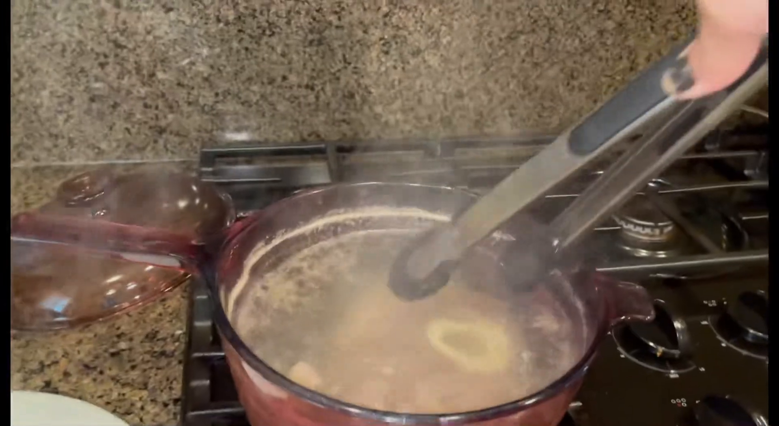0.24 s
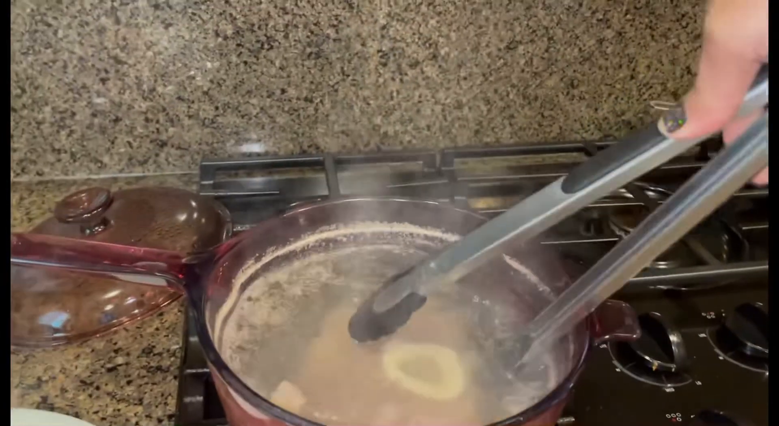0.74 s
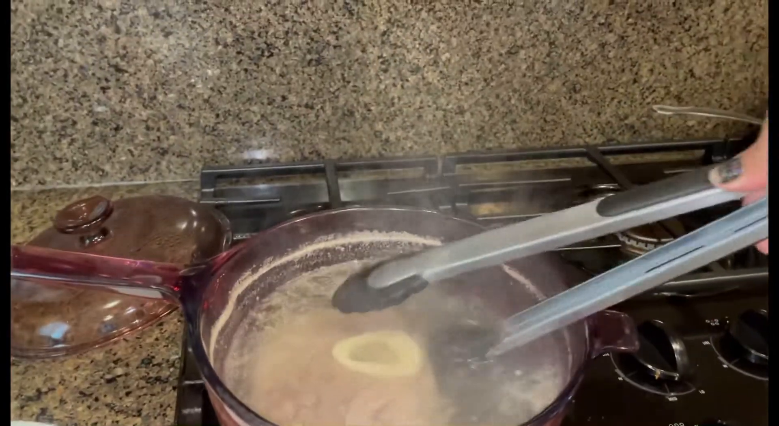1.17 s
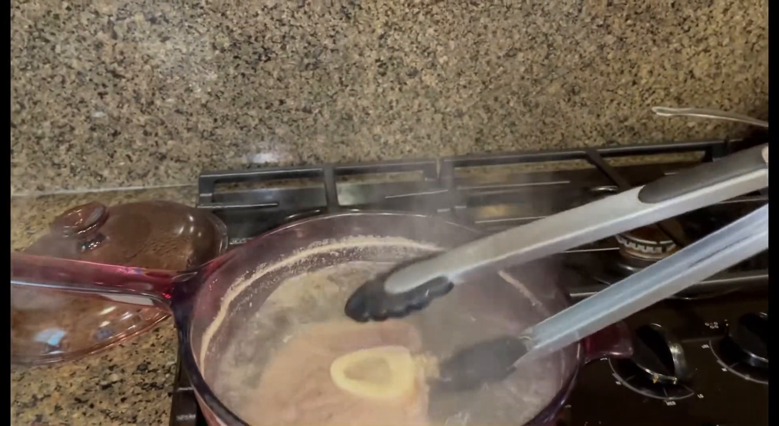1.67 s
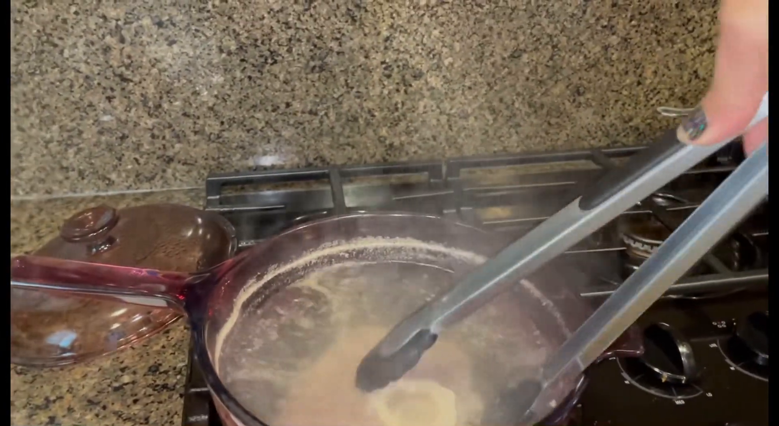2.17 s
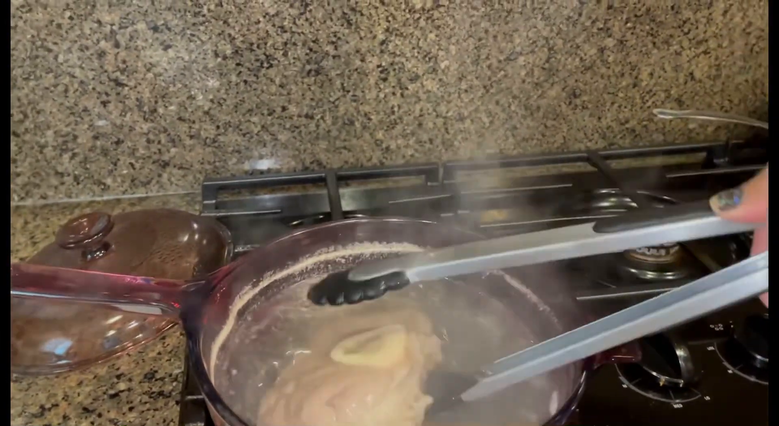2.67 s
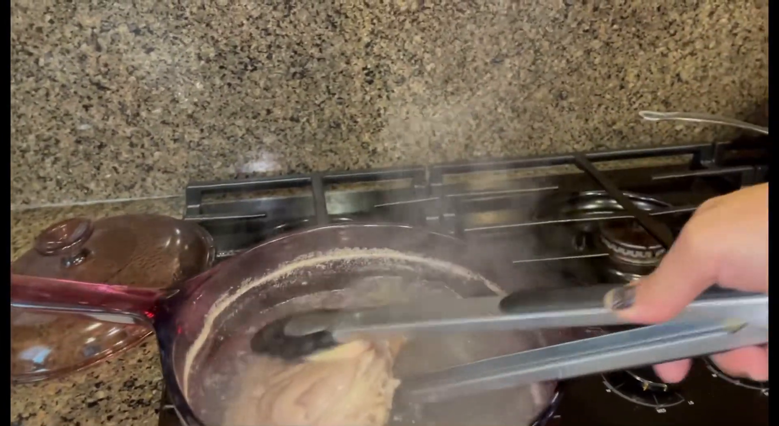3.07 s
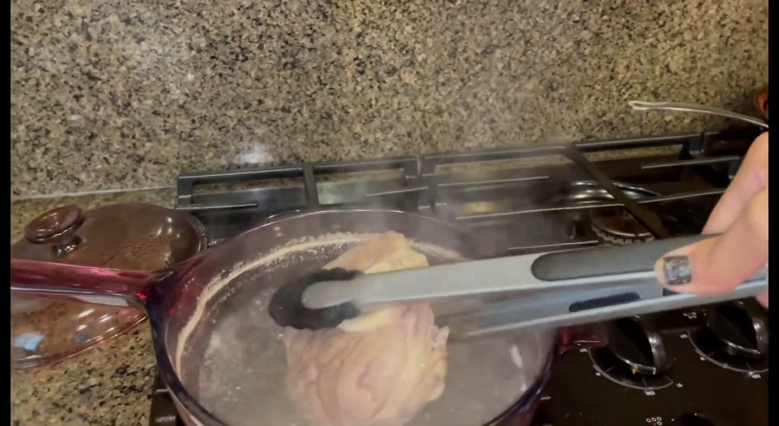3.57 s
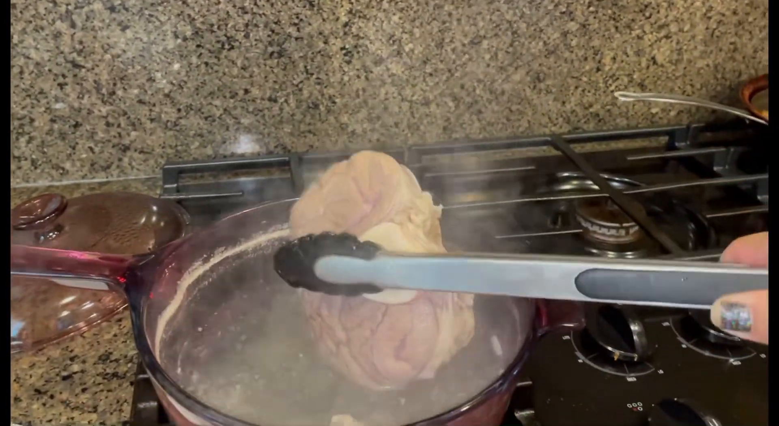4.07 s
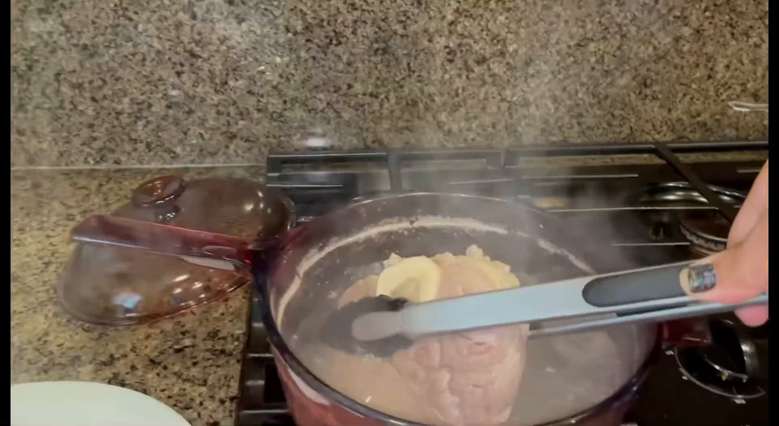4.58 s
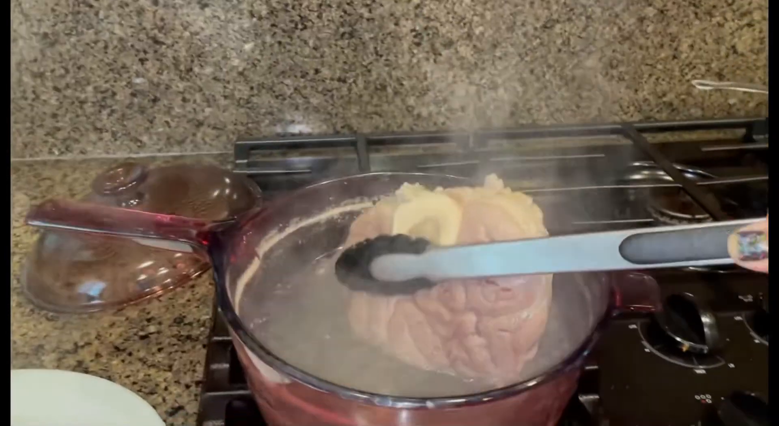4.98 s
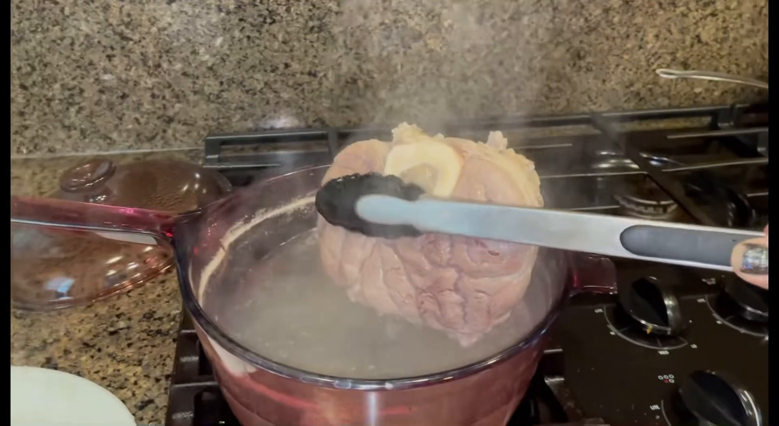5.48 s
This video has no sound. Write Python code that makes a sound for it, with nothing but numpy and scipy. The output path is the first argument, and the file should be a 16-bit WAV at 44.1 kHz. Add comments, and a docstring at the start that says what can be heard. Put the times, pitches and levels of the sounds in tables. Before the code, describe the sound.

A pot simmers close by with dark rumble, appliance hum and small liquid gulps. Metal tongs click on its glass rim, brightest near the beginning, with faint slides and dull underwater knocks. After a pause, the tong arms clatter together as meat drops back with a brief slosh. The kitchen ring cuts off suddenly, leaving hissing steam and crisp fizzing ticks.

```python
"""In a hard-walled kitchen, steel tongs tap and slide on the rim of a simmering glass pot.
The meat slips, the tong arms clash, and it splashes back; blows are ringing modes plus short noise cracks.
Ticks fizz, air pockets gulp, appliances hum, the burner rumbles and steam hisses: sines and filtered noise.
At 4.42 s most ringing stops short, and the rumble and hum dip briefly.
Two close microphone ports give a sum and a difference signal, each with its own colour."""
import sys
import numpy as np
from scipy import signal
from scipy.fft import rfft, irfft
from scipy.io import wavfile

SR = 44100
rng = np.random.default_rng(int(sys.argv[2]) if len(sys.argv) > 2 else 0)


def bounce(signal):
    """Save signal as a 16-bit WAV file at the path given by the first command-line argument."""
    frames = np.transpose(np.atleast_2d(signal))
    limited = np.clip(frames, -1, 1)
    pcm = np.round(limited * 32767).astype(np.int16)
    wavfile.write(sys.argv[1], SR, pcm)


N = 252693
TIME = np.arange(N) / SR   # s
BREAK_S = 4.42   # most ringing and the splash stop short here


def from_db(db):
    """Decibels to gain."""
    return 10 ** (np.asarray(db) / 20)


def rms_one(x):
    """Scale to unit rms."""
    return x / np.sqrt(np.mean(x ** 2) + 1e-20)


def in_time(rows):
    """Columns of a curve at every sample."""
    s, *columns = np.transpose(rows)
    return [np.interp(TIME, s, c) for c in columns]


def at_hz(points, hz):
    """Value of a (frequency, value) table, straight on a log axis."""
    table_hz, values = np.array(points).T
    return np.interp(np.log(hz + 1), np.log(table_hz), values)


def coloured(x, *spectra):
    """Filter by the sum of dB spectra."""
    hz = np.fft.rfftfreq(x.shape[-1], 1 / SR)
    gain = from_db(sum(at_hz(spectrum, hz) for spectrum in spectra))
    return irfft(rfft(x) * gain, x.shape[-1])


def band_pass(x, order, low_hz, high_hz):
    """Keep only the sound between two frequencies."""
    return signal.sosfilt(signal.butter(order, [low_hz, high_hz], "band", fs=SR, output="sos"), x)


def clicks_at(seconds, level_db):
    """Silence with one click of the given level at each time."""
    clicks = np.zeros(N)
    clicks[np.round(seconds * SR).astype(int)] = from_db(level_db)
    return clicks


def drift(rate):
    """Slow random wander of spread 1, made at every 40th sample and joined by straight lines."""
    r = np.exp(-80 * np.pi * rate / SR)
    slow = signal.lfilter([1], [1, -2 * r, r * r], rng.standard_normal(N // 40 + 2002))[2000:]
    return np.interp(np.arange(N) / 40, np.arange(len(slow)), rms_one(slow))


def ring(clicks, hz, t60):
    """A unit click sets off a dying sine of starting height 1; t60 is the time to fall 60 dB."""
    r, w = from_db(-60 / (t60 * SR)), 2 * np.pi * hz / SR
    return signal.lfilter([0, np.sin(w)], [1, -2 * r * np.cos(w), r * r], clicks + 1e-18)


def gliding_ring(clicks, hz, t60):
    """As ring, for a pitch given at every sample; the imaginary part is the sine."""
    turn = np.exp(2j * np.pi * np.cumsum(hz) / SR)
    return turn * signal.lfilter([1], [1, -from_db(-60 / (t60 * SR))], clicks / turn + 1e-18)


RISE_S = 0.00046   # time constant of a burst's rise


def bursts(seconds, level_db, t60):
    """Noise under a quick rise and exponential fall, two unrelated draws."""
    rise = np.exp(-1 / (RISE_S * SR))
    fall = from_db(-60 / (t60 * SR))
    poles = np.convolve([1, -fall], [1, -rise])
    shape = signal.lfilter([1 - rise], poles, clicks_at(seconds, level_db) + 1e-18)
    return shape * rng.standard_normal((2, N))


def strokes(table, edges):
    """Level in dB: a ramp in, a straight run from start to end level, a ramp out; the loudest stroke wins."""
    rise, fall = edges   # dB per s
    levels = []
    for s, length, start_db, end_db in table:
        run = np.interp(TIME, [s, s + length], [start_db, end_db])
        ramp_in = rise * np.maximum(s - TIME, 0)
        ramp_out = fall * np.maximum(TIME - s - length, 0)
        levels.append(run - ramp_in - ramp_out)
    return np.max(levels, axis=0)


def slips(level_db, per_s, uneven_db):
    """Rubbing as uneven small slips, clumped by a random wander of their rate."""
    born = rng.random(N) < per_s * from_db(3.5 * drift(15)) / SR
    return born * from_db(uneven_db * np.minimum(rng.exponential(1, N), 5) + level_db)


# edges of the mode groups: (frequency [Hz])
GROUP_EDGES_HZ = [300, 1500, 2700, 4500, 7500, 16000]
SNAP_DB = 10.5   # the first instant of a crack, over its noise level
SHIMMER_DB, SHIMMER_T60_S = -20.5, 0.22


def cracks_and_shimmer(s, peak_db, crack_db, group_db, shimmer):
    """A blow's short crack, and its countless faint modes heard as dying noise, band by band."""
    crack, faint = np.zeros((2, 2, N))
    for low, high, shade_db in zip(GROUP_EDGES_HZ, GROUP_EDGES_HZ[1:], group_db):
        level_db = peak_db + crack_db + shade_db + 14.5
        noise = bursts(s, level_db, 0.00081) + bursts(s, level_db - 17.0, 0.058)
        noise[0, np.round((s + RISE_S) * SR).astype(int)] += from_db(level_db + SNAP_DB)
        crack += band_pass(noise, 2, low, high)
        faint += band_pass(bursts(s, peak_db + shade_db + SHIMMER_DB, SHIMMER_T60_S), 2, low, high)
    return crack + coloured(faint, shimmer)


# how far brightness tilts each mode group: (distance from 2 kHz [octaves])
GROUP_OCTAVES = [0, 0.092, 0.62, 1, 2.36]
# how rubbing shares out over the modes: (frequency [Hz], level [dB])
RUB = [(400, -15), (1000, -9.5), (2250, -7), (2700, -3), (4400, -4), (5150, -8), (6000, -2.5), (9000, -9),
       (14000, -9.5)]
DETUNE = 0.0077   # grip and place shift each mode from blow to blow, at most this share of pitch
PORT_TURN = 2.1   # phase of a mode in the difference against the sum (radians)


def blows(table, modes, tuned, shimmer, share_db, pan_db, contact, rubbing, scatter_db):
    """Every blow rings every mode, retuned a little, and adds a crack; the grip-tuned ring is returned apart."""
    s, peak_db, brightness, crack_db, body_db, lean_db, ring_pitch, ring_db = np.transpose(table)
    group_db = np.outer(GROUP_OCTAVES, brightness) + np.reshape(share_db, (-1, 1))
    group_db += [body_db, 0 * s, lean_db, -lean_db, 0 * s]
    latest_blow = np.maximum(np.searchsorted(s, TIME) - 1, 0)

    def struck_mode(hz, level_db, t60, scatter_db):
        """One mode, pitch and level given for each blow, as sum and difference."""
        rub_gain = from_db(level_db.mean() + at_hz(RUB, hz.mean()))
        clicks = rubbing * rub_gain * rng.choice([-1, 1], N)
        chance = rng.random((len(s), 3))
        # each mode starts at its own random moment within the contact
        at = np.round((s + contact * chance[:, 0]) * SR).astype(int)
        group = np.searchsorted(GROUP_EDGES_HZ[1:], hz.mean())
        scatter = scatter_db * (2 * chance[:, 1] - 1.5)
        clicks[at] += from_db(peak_db + level_db + group_db[group] + scatter - 4.5)
        blow_hz = hz * (1 + DETUNE * (2 * chance[:, 2] - 1))
        wave = gliding_ring(clicks, blow_hz[latest_blow], t60)
        side_turn = rng.choice([-1, 1]) * np.exp(1j * PORT_TURN)
        return np.imag(wave * [[1], [side_turn]])

    out = sum(struck_mode(hz + 0 * s, level_db + 0 * s, t60, scatter_db) for hz, level_db, t60 in modes)
    beamed = sum(struck_mode(share * ring_pitch, level_db + ring_db, t60, 0) for share, level_db, t60 in tuned)
    out += cracks_and_shimmer(s, peak_db, crack_db, group_db, shimmer)
    out[1] += out[0] * np.tanh(pan_db / 17)   # sideways place leaks sum into difference
    return out, beamed


# tongs on the glass rim: (time [s], level at 2 kHz [dB], brightness [dB per octave], crack [dB],
# body under 1.5 kHz [dB], lean from 5 to 3.6 kHz [dB], pitch of the grip-tuned ring [Hz], its level [dB])
TAPS = [(0.0432, -48, -8.5, -10, -4.5, 3, 4760, 2), (.117, -67, 2.5, -6, -12, 2.5, 5060, -12),
        (0.3717, -33, 4.5, -4, 0, 2.5, 4890, 4), (0.394, -39, 2.5, -16, 2.5, 1, 4900, 2),
        (0.4103, -42, -7.5, -9, -1.5, -2, 4840, 4), (0.8909, -34.5, -0.1, -4.5, -4, 1.8, 5040, -0.5),
        (1.0195, -48.5, 0.5, -13, 0, 1, 5140, -6), (1.3701, -27, 2, 0, -2.5, 1, 5170, 1.5),
        (1.5014, -45, -4, 4, -2, 0.5, 5070, -3), (2.133, -47.5, -4, -12, 4.5, 1, 5100, -6),
        (2.1779, -40.5, 1, 2.5, 0.5, 4.5, 5170, 7.5), (2.3127, -50.5, -4.5, 1, 1.5, 1.5, 5050, 5),
        (2.397, -59, -10, -10, 7, -4, 5100, -4), (2.4251, -45.5, -1.5, -4, 2.5, 1, 4870, -3),
        (2.7671, -38.5, 1, -3.5, -2.5, 0.5, 4360, -3), (2.8409, -44, -2.5, -8, -1, 0.5, 5170, -1.5),
        (2.8939, -52.5, -21, -18, -1, .1, 5000, 0), (2.972, -51, -6, -10, -15, 2.5, 4860, -8),
        (3.0071, -58, -14, -17, -13, 2, 5100, -0.5)]
# an arm slides on the rim: (start [s], length [s], level at the start [dB], level at the end [dB])
SLIDE = [(1.6, 0.23, -85, -81), (2.04, 0.43, -77, -78.5), (2.78, 0.08, -82, -82), (2.893, 0.021, -85, -90),
         (2.93, .06, -90, -91)]
# ringing modes of the rim: (frequency [Hz], level [dB], time to fall 60 dB [s])
RIM = [(320.7, -7.5, 0.19), (376, -8.5, 0.12), (421, -3.5, 0.14), (565, -12, 0.17), (671, -13, 0.19),
       (743, -7.5, 0.044), (915, -11, 0.18), (1042, -6.5, 0.11), (1079, -11.5, 0.16), (1312, -7.5, 0.078),
       (1459, -9.5, 0.14), (1593, -7, 0.023), (2210, -5.5, 0.032), (2275, 7, 0.031), (2450, -8, 0.0322),
       (2507, -5.5, 0.083), (2650, -18, 0.16), (2890, -0.5, 0.015), (3220, 0, 0.0024), (3424, -1, 0.022),
       (3684, -5.5, 0.025), (3530, -20.5, 0.14), (3587, -14.5, 0.16), (3880, -8, .05), (4030, -3, 0.021),
       (4190, 2.5, 0.011), (4830, -14, 0.14), (5100, -9.5, 0.11), (5230, -15, .08), (5410, -12.5, 0.095),
       (5700, -8, 0.0099), (6400, -27, 0.056), (6170, -20, 0.021), (6540, 0, 0.0061), (7230, -1, 0.014),
       (8170, 4.5, 0.015), (9700, -3, 0.0061), (10860, 4.5, 0.019), (13000, 11, 0.01)]
# grip-tuned ring: (share of its pitch [ratio], level [dB], time to fall 60 dB [s])
RIM_RING = [(.965, 0, 0.025), (1.002, 9.5, .013), (1.04, -3, 0.02)]
# colour of the faint rim modes: (frequency [Hz], level [dB])
RIM_SHIMMER = [(1500, 8), (1900, -9), (2200, 21), (2520, 6), (2800, 5), (3550, 13), (3850, -14), (4300, 4),
               (4700, -1), (5150, 10), (5400, 8), (6000, -1.5), (8000, 1)]
# share of a tap in each mode group: (level [dB])
RIM_GROUP_DB = [0.67, 1, 0.37, -1, -3.1]


def rim_taps():
    """Steel taps and rubs the glass rim and sets its modes ringing."""
    rubbing = slips(strokes(SLIDE, edges=(210, 340)), per_s=1000.0, uneven_db=0.5)
    return blows(TAPS, RIM, RIM_RING, RIM_SHIMMER, RIM_GROUP_DB, pan_db=2.5,
                 contact=.0016, rubbing=rubbing, scatter_db=6.0)   # contact in s


# the arms clash and rattle, their ring sinks as they spring open: columns [units] as for the taps
CLASH = [(4.2222, -63.5, 2, -9, -8.5, -1, 2330, -6.5), (4.2445, -54, -4, -13, -3, -3, 2380, 4),
         (4.2615, -40.5, -3, -22.5, 4, 0, 2450, 15.5), (4.2635, -29, -7.5, -20.5, 6, -2.8, 2323, 17),
         (4.2692, -29, 3.5, -12, 8.5, 3.5, 2335, 7.5), (4.2812, -20, 0.5, 3.5, -8.5, -0.5, 2300, -5),
         (4.2838, -21, -6.5, -11, -1, 5, 2170, 6.5), (4.2948, -32.5, 3.5, 4, -4, -1.5, 2100, -11.5),
         (4.3058, -30, 3.5, -6, -5, 2.6, 2210, 9), (4.3115, -36, -5, -15.5, 1.5, -3.5, 2120, 7),
         (4.3155, -40.5, -5.5, -4, -4.5, -3, 2080, -4.5), (4.3275, -39, -4.5, -9.5, 10.5, 4, 2110, 0.5),
         (4.338, -47, -2, -1.5, 5, 3.5, 2100, -7)]
# the arms scrape off the meat, chatter, settle:
# (start [s], length [s], level at the start [dB], level at the end [dB])
CHATTER = [(4.236, 0.022, -71, -63), (4.262, 0.058, -46, -54), (4.32, 0.041, -58, -69)]
# ringing modes of the arms: (frequency [Hz], level [dB], time to fall 60 dB [s])
ARMS = [(615, -18.5, 0.015), (780, -12.5, 0.016), (903, -4.5, 0.058), (968, -4, 0.03), (1276, -6.5, 0.044),
        (1544, -5.5, 0.03), (2670, -5, 0.021), (3090, -1.5, 0.0059), (3590, -13.5, .012), (4010, -7, 0.038),
        (4000, -4, 0.015), (4400, -1.5, 0.017), (4840, -3, 0.011), (4900, -15, 0.011), (5200, -7.5, 0.023),
        (5990, -3.5, 0.01), (6720, -2, 0.028), (5740, -9, 0.0085), (6870, -8.5, 0.018), (7040, -9.5, 0.01),
        (8950, 5.5, 0.01), (11200, 7.5, 0.0072), (11620, -5, 0.011), (14000, -8.5, 0.0075),
        (12740, -7, 0.0097)]
# grip-tuned ring: (share of its pitch [ratio], level [dB], time to fall 60 dB [s])
ARM_RING = [(1.005, 3.5, 0.036), (1.04, -15, .013)]
# colour of the faint arm modes: (frequency [Hz], level [dB])
ARM_SHIMMER = [(1500, 0.5), (4000, 0.047), (6400, 1.5), (8000, -0.5)]
# share of a clash in each mode group: (level [dB])
ARM_GROUP_DB = [-3.5, -3, 4, 2, -1]


def arm_clash():
    """The tong arms hit and scrape, and their own steel modes ring."""
    rubbing = slips(strokes(CHATTER, edges=(2800, 2000)), per_s=1500., uneven_db=4.5)
    return blows(CLASH, ARMS, ARM_RING, ARM_SHIMMER, ARM_GROUP_DB, pan_db=3.5,
                 contact=0.00089, rubbing=rubbing, scatter_db=5)   # contact in s


# the meat shifts, later falls back in:
# (start [s], length [s], level at the start [dB], level at the end [dB])
SPLASH = [(2.865, 0.039, -55.5, -45.5), (4.326, 0.044, -40, -43)]


def splash():
    """A low lumpy slosh: noise between 50 and 300 Hz, silent after the break."""
    slosh = band_pass(rng.standard_normal((2, N)), 3, 50, 300)
    level = from_db(strokes(SPLASH, edges=(4900, 480)))
    return rms_one(slosh) * level * (TIME < BREAK_S) * [[1], [.2]]


# short ticks with a fizz: the scrape's onset at 4.24 s, then drops spitting on hot metal:
# (time [s], tick level [dB], dull part level [dB], fizz level [dB])
TICKS = [(4.24, -46, -38.5, -41.5), (4.6272, -27, -25.5, -44.5), (5.0794, -29.5, -38.5, -47.5)]


def fizzing_ticks():
    """A sharp tick with a fizz after it, plus a duller part."""
    s, peak_db, dull_db, fizz_db = np.transpose(TICKS)
    bright = bursts(s, peak_db + 1.0, 0.0071) + bursts(s, fizz_db, 0.15)
    dull = bursts(s, dull_db, 0.0028) + bursts(s, dull_db - 19.5, 0.11)
    # colours as (Hz, dB)
    bright_colour = [(5000, -33.0), (7500, -3.0), (14000, 5.5), (16000, -4.5)]
    dull_colour = [(250, -10.5), (1100, 3), (1850, 3.5), (2800, -1.5), (4100, 0.5), (4600, 0.0),
                   (5200, -3.0), (6200, -10.5), (9000, -18.5)]
    return coloured(bright, bright_colour) + coloured(dull, dull_colour)


# bone on glass under the broth: (time [s], click level [dB])
KNOCKS = [(2.135, -45.5), (2.971, -45.5)]
# modes of the knock: (frequency [Hz], level [dB], time to fall 60 dB [s])
SUNK_MODES = [(996, 2.5, 0.025), (1150, -7, 0.0088), (1366, -1, 0.026), (1610, -25, .02)]


def knocks():
    """Short and dull, damped by the liquid: a click into a few broad modes."""
    clicks = clicks_at(*np.transpose(KNOCKS))
    knock = sum(from_db(level_db) * ring(clicks, hz, t60) for hz, level_db, t60 in SUNK_MODES)
    return knock * np.array([[1], [.7]])


def bubbles(count):
    """Small bubbles of the simmer: rows like those of the gulps, drawn at random."""
    low_hz, high_hz = 201, 656
    rows = []
    for when, size, pitch in rng.random((count, 3)):
        level_db = -59 - 2.5 * np.log(0.17 + .8 * size)
        rows.append((when * TIME[-1], level_db, low_hz * (high_hz / low_hz) ** pitch))
    return rows


# broth gulps round the meat: (time [s], level [dB], starting pitch [Hz])
GULPS = [(.136, -54, 764), (.223, -49.5, 700), (2.737, -58, 900), (2.89, -47, 170), (2.903, -53, 276),
         (2.918, -57, 200), (2.873, -69, 460), (2.913, -47, 754), (2.926, -56, 375), (0.269, -68, 415),
         (1.009, -51, 1460), (1.258, -56, 672), (2.995, -68, 950), (0.324, -42.5, 307), (1.989, -39, 108.6),
         (2.13, -44, 261), (2.17, -44, 72), (2.289, -44, 75.3), (2.43, -47.5, 193), (2.86, -43, 74.5),
         (2.893, -47.5, 625), (2.905, -48, 583), (2.9, -44, 118), (3.582, -52, 152.7)]


def gulps():
    """Each air pocket rings a few cycles while its pitch rises."""
    out = np.zeros(N + SR)
    t = TIME[:SR // 8]
    for s, peak_db, hz in GULPS + bubbles(count=60):
        cycles = hz * t
        rising_tone = np.sin(2 * np.pi * cycles * (1 + 0.037 * cycles))
        envelope = np.exp(-cycles / 3.2) * (1 - np.exp(-cycles / 0.2))
        start = round(s * SR)
        out[start:start + len(t)] += from_db(peak_db) * rising_tone * envelope
    return out[:N] * [[1], [.25]]


# steam puffs: (time [s], width [s], rise [dB])
PUFFS = [(4.14, 0.017, 14.5), (4.83, 0.0071, 4.5), (5.40, 0.0065, 5), (5.499, 0.0061, 4.5)]
# colour of the hiss in the sum: (frequency [Hz], level [dB per Hz])
STEAM_SUM = [(4500, -10), (5800, -12.5), (7200, -3.5), (7700, -10.5), (8200, -29.5), (9400, -27),
             (9900, -8), (11000, -4.5), (13100, 0.5), (14200, -6), (14700, -14.5), (16000, -29)]
# colour of the hiss in the difference: (frequency [Hz], level [dB per Hz])
STEAM_DIFF = [(4500, -16.5), (6240, -13.5), (7170, -4.5), (8160, 1), (9850, -4), (12600, -7.5),
              (13000, -19), (13400, -52), (16000, -36.5)]
# colour of the ventilation: (frequency [Hz], level [dB per Hz])
AIR = [(1200, -34), (1600, -26.5), (2100, -6), (2800, -5.5), (3150, 2), (3400, -3.5), (4300, -8.5),
       (4800, -14), (5600, -20), (6500, -37.5)]


def steam(level_db):
    """Smooth faint hiss with a few puffs, over ventilation noise that swells a little less with them."""
    puff_db = sum(rise_db * np.exp(-.5 * ((TIME - s) / width) ** 2) for s, width, rise_db in PUFFS)
    noise = rng.standard_normal((4, N))
    hiss_sum = from_db(0.5) * rms_one(coloured(noise[0], STEAM_SUM))
    hiss_diff = from_db(1) * rms_one(coloured(noise[1], STEAM_DIFF))
    hiss_gain = from_db(level_db + puff_db + 1.1 * drift(12))
    air = rms_one(coloured(noise[2:], AIR)) * [[1], [.8]]
    air_gain = from_db(-75 + 0.76 * puff_db + 0.48 * drift(3))
    return hiss_gain * np.array([hiss_sum, hiss_diff]) + air_gain * air


# colour of the rumble: (frequency [Hz], level [dB per Hz])
RUMBLE = [(20, -34.5), (33, -29.5), (43, -19), (50, 3), (70, 1.5), (92, -8.5), (128, -1), (176, -10.5),
          (242, -12), (302, -18.5), (378, -17.5), (487, -22), (553, -15), (650, -23), (1010, -28.5),
          (2000, -45.5), (2600, -75)]
# difference minus sum: (frequency [Hz], level [dB])
RUMBLE_SIDE = [(60, -20), (130, -18), (290, -5), (640, -2.5), (1410, -1.5), (3100, -5.5), (6820, 1),
               (15000, -10.5)]


def rumble(level_db):
    """Burner roar and stirred broth: dark, lumpy noise, strongest in the sum at low pitch."""
    noise = rng.standard_normal((2, N)) * from_db(1.0 * drift(36))
    total = coloured(noise[0], RUMBLE)
    apart = coloured(noise[1], RUMBLE, RUMBLE_SIDE)
    return from_db(level_db) * np.array([total, apart]) / np.std(total)


# tones of nearly steady level: (frequency [Hz], level [dB])
MAINS = [(120, -56), (372, -64.5)]
# wavering tones: (frequency [Hz], width [Hz], level [dB])
HUM = [(53.2, 6.2, -63.5), (117.8, 1.4, -61), (237.25, 6.5, -67.5), (555, 27, -73)]


def hum():
    """Motor tones: sines of slightly drifting level, and noise twice through narrow resonances that wavers."""
    out = np.zeros(N)
    for hz, level_db in MAINS:
        gain = from_db(level_db + 0.85 * drift(1.8))
        out += gain * np.sin(2 * np.pi * (hz * TIME + rng.random()))
    for hz, width_hz, level_db in HUM:
        t60 = 2.2 / width_hz
        noise = rng.standard_normal(N + SR)
        settled = ring(ring(noise, hz, t60), hz, t60)[SR:]   # skip the build-up
        out += from_db(level_db) * rms_one(settled)
    return out * [[1], [.08]]


# how long the tail lasts: (frequency [Hz], time to fall 60 dB [s])
ROOM_T60 = [(200, 0.93), (1000, 0.26), (3000, 0.97), (6000, 0.29), (12000, 0.27)]
# colour of the diffuse tail: (frequency [Hz], level [dB])
WALLS = [(100, 0), (700, 7), (1600, 4), (2300, -6), (2900, -1.5), (3550, 0), (4200, 1.5), (5200, 0.5),
         (6000, 5.5), (8000, -3), (14000, 1.5), (14800, -23)]
ROOM_DB, ROOM_BUILD_S = -13, 0.0047   # level of the tail, time constant of its build-up


def kitchen(x):
    """Direct sound plus a diffuse tail that dies by octave, another one for each port signal."""
    t = TIME[:SR]
    tail = np.zeros((2, SR))
    for low in 100 * 2.0 ** np.arange(7.5):
        octave = band_pass(rng.standard_normal((2, SR)), 2, low, min(2 * low, .45 * SR))
        tail += octave * from_db(-60 * t / at_hz(ROOM_T60, np.sqrt(2) * low))
    tail = coloured(tail, WALLS) * (1 - np.exp(-t / ROOM_BUILD_S))
    tail /= np.sqrt(np.sum(tail ** 2) / 2)
    return x + from_db(ROOM_DB) * signal.fftconvolve(x[:1], tail, axes=1)[:, :N]


# colour of the sum for blows: (frequency [Hz], level [dB])
PORT_SUM = [(100, 2), (6500, 2), (7500, -2.5), (8200, -9.5), (9400, -9), (10000, -5.5), (11000, -6),
            (14000, -0.5), (16000, -15.5)]
# colour of the difference for blows: (frequency [Hz], level [dB])
PORT_DIFF = [(100, -20), (400, -5.5), (1200, -0.5), (5000, -0.5), (8500, 3.5), (11000, -0.5),
             (13000, -21.5), (16000, -20.5)]


def ports(x):
    """The two close ports colour their sum and their difference differently."""
    return np.array([coloured(x[0], PORT_SUM), coloured(x[1], PORT_DIFF)])


# burner and stirred broth: (time [s], rumble level [dB], steam level [dB])
SIMMER = [(0.0, -51, -76), (0.38, -49.5, -74), (1.02, -50.5, -74), (1.79, -50, -75.5), (2.67, -49.5, -75),
          (2.91, -48.5, -75), (4.0, -49, -77.5), (4.25, -48.5, -74.5), (4.45, -49, -60.5),
          (4.79, -49.5, -69.5), (5.73, -51, -70)]
BREAK_DB, BREAK_FADE_S = -12, .025   # rumble and hum drop to this level, then swell back over this time
RING_ROOM_SHARE = 0.45   # the grip-tuned ring is beamed at the ports, the walls get this share


def scene():
    """Sum and difference signals are built first, then turned into left and right."""
    before = TIME < BREAK_S
    rim, rim_ring = rim_taps()
    arms, arm_ring = arm_clash()
    beamed = rim_ring + arm_ring
    struck = rim + arms + RING_ROOM_SHARE * beamed + fizzing_ticks() + gulps() + knocks()
    # the room tail is cut at the break; the directly beamed share rings on
    in_room = kitchen(struck * before) * before + kitchen(struck * ~before)
    struck = ports(in_room + (1 - RING_ROOM_SHARE) * beamed)
    rumble_db, steam_db = in_time(SIMMER)
    fade_left = np.clip(1 - (TIME - BREAK_S) / BREAK_FADE_S, 0, 1)
    swell = np.where(before, 1, from_db(BREAK_DB * fade_left))
    total, apart = struck + splash() + swell * (rumble(rumble_db) + hum()) + steam(steam_db)
    return np.array([total + apart, total - apart])


def record(dry):
    """The lowest bass (36 Hz) and the top (16.6 kHz) are cut."""
    dry = signal.sosfilt(signal.butter(2, 36, "high", fs=SR, output="sos"), dry)
    return signal.sosfilt(signal.cheby2(12, 70, 16600, fs=SR, output="sos"), dry)


dry = scene()
out = record(dry)
bounce(out)
```